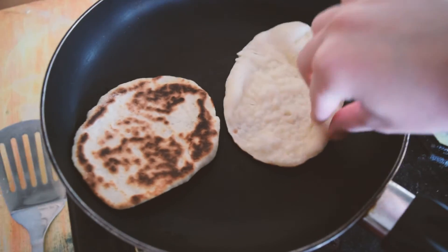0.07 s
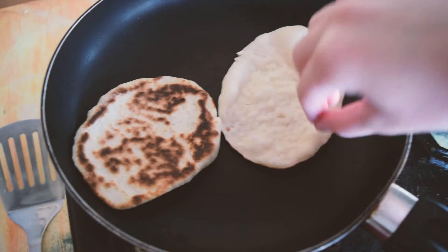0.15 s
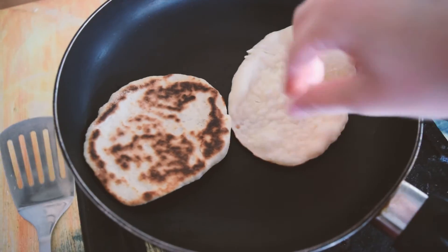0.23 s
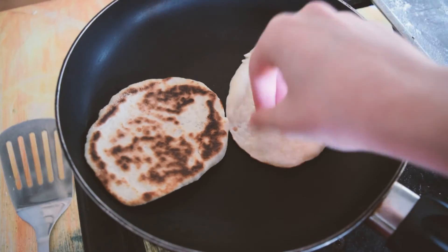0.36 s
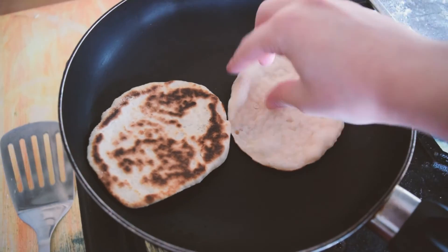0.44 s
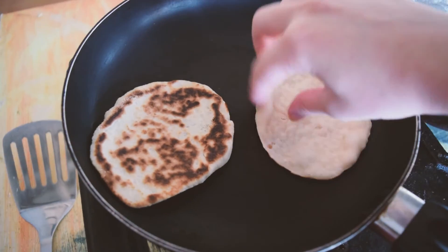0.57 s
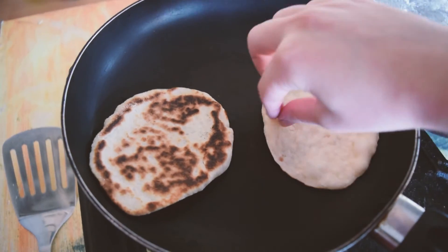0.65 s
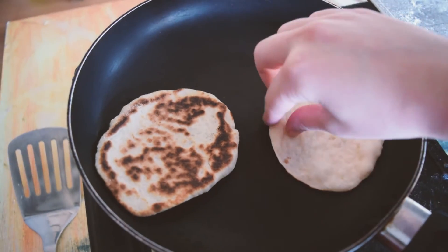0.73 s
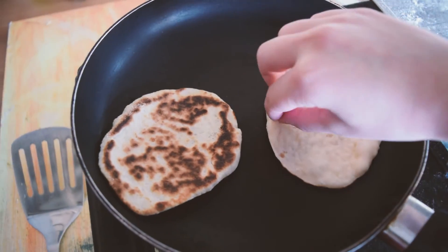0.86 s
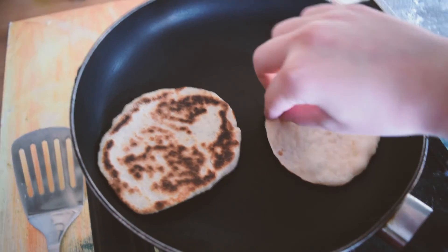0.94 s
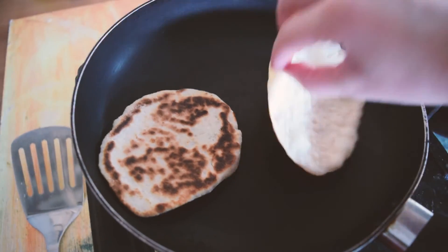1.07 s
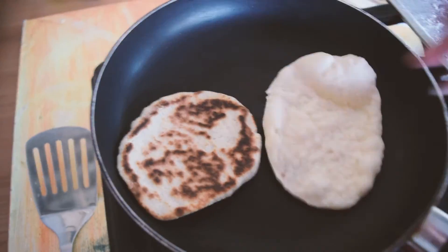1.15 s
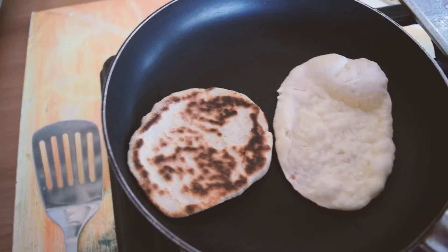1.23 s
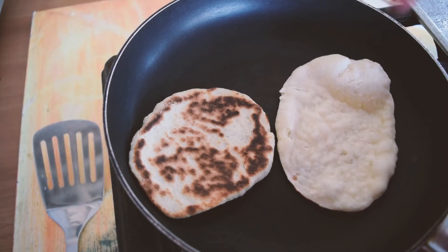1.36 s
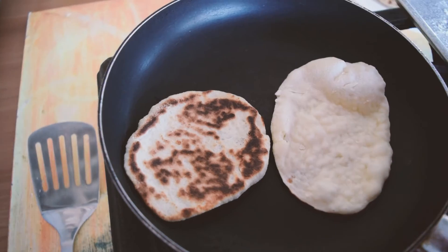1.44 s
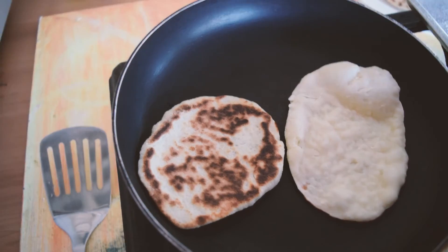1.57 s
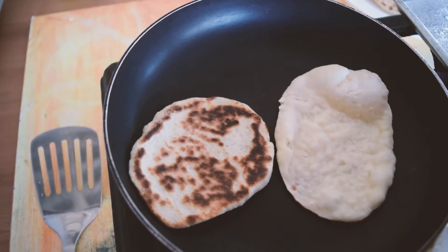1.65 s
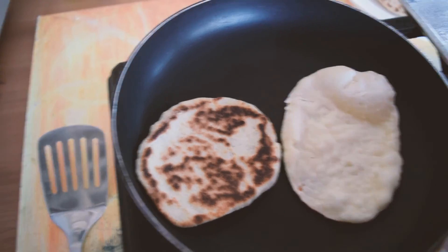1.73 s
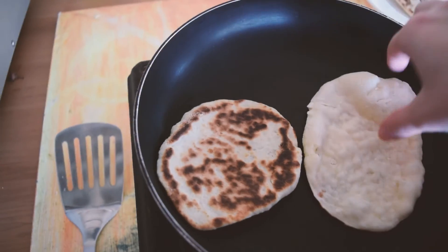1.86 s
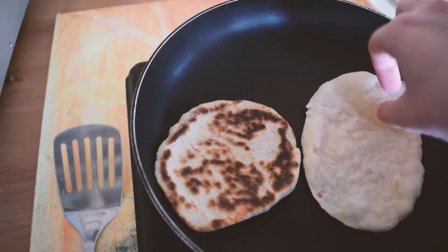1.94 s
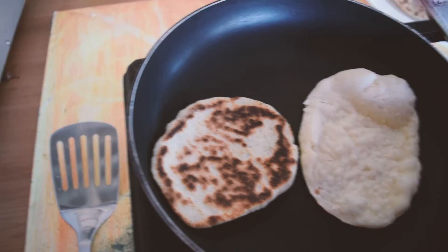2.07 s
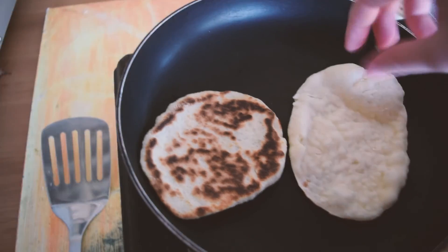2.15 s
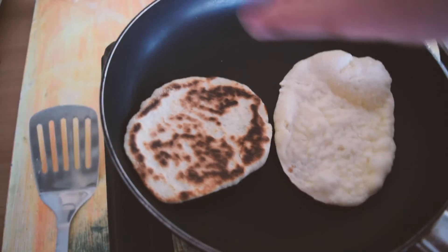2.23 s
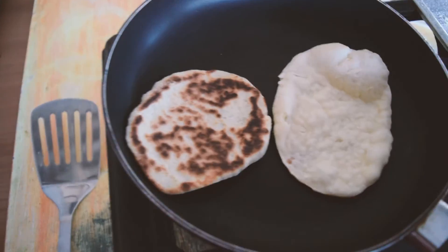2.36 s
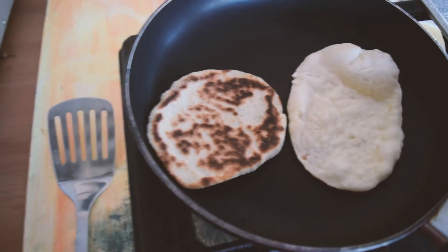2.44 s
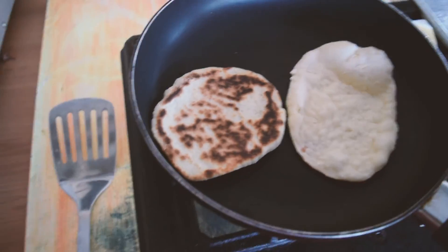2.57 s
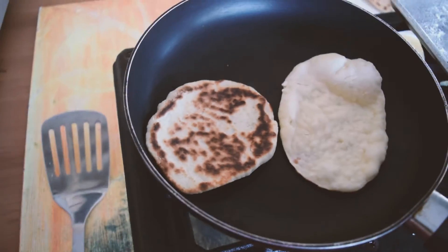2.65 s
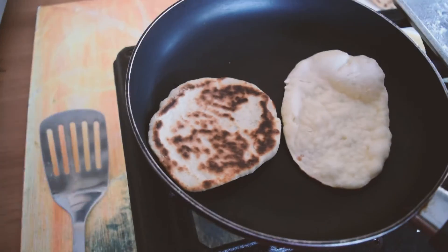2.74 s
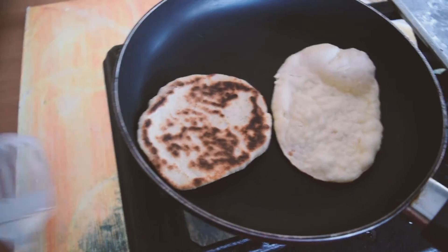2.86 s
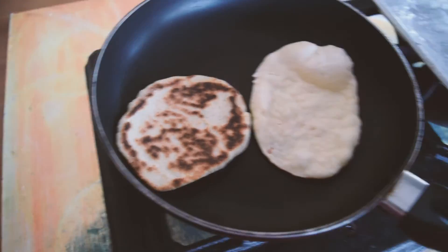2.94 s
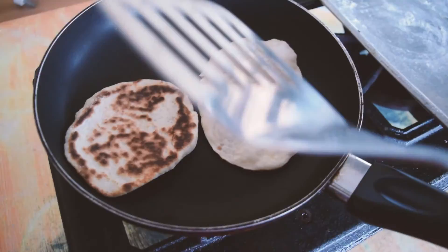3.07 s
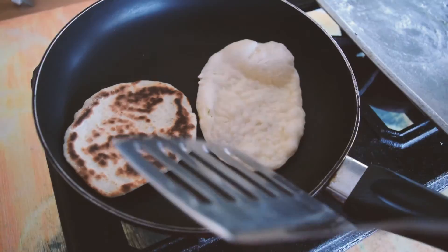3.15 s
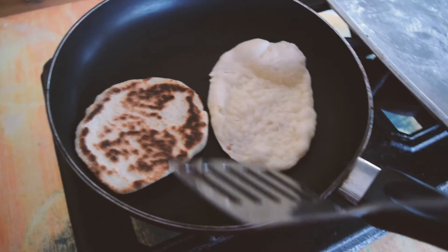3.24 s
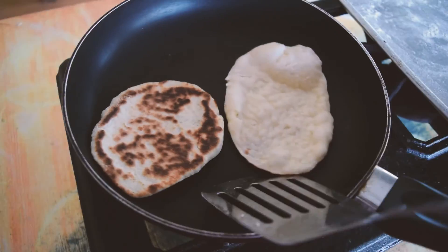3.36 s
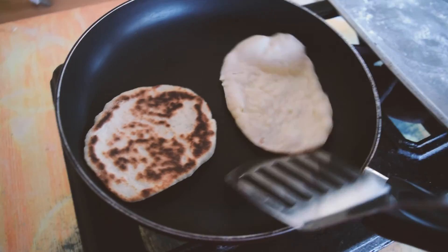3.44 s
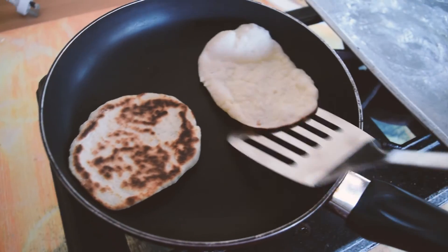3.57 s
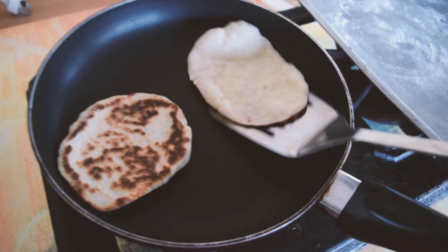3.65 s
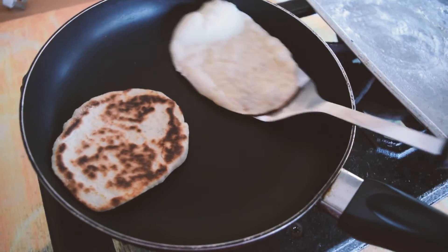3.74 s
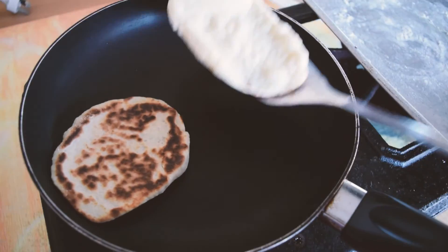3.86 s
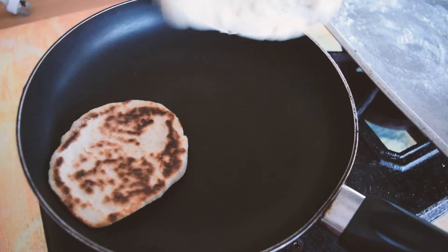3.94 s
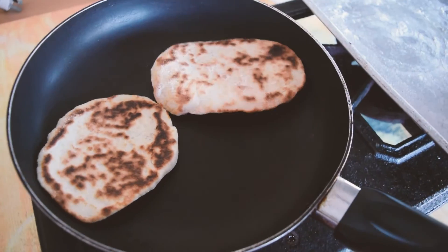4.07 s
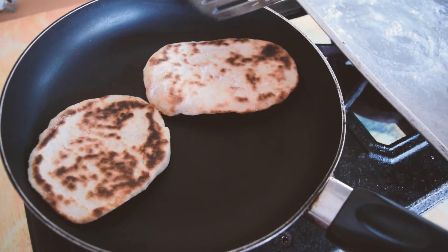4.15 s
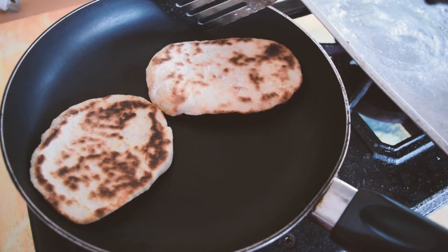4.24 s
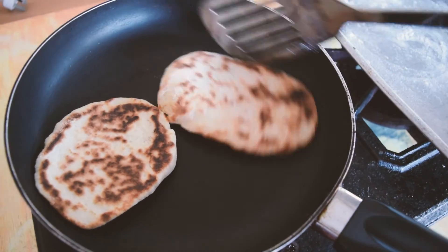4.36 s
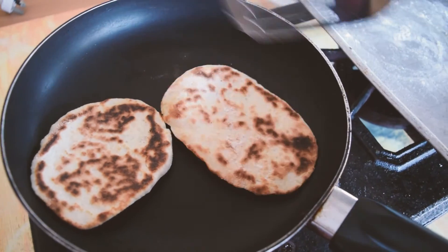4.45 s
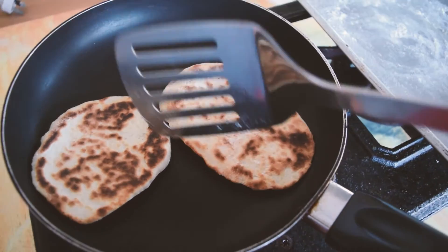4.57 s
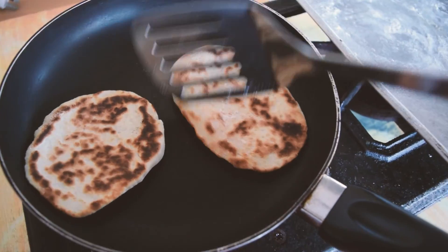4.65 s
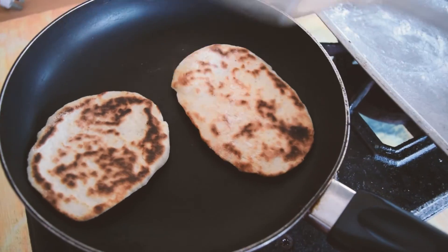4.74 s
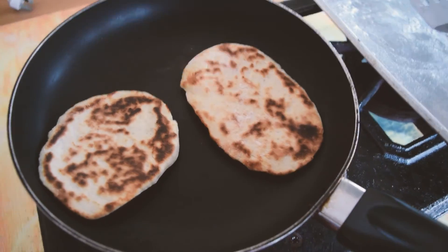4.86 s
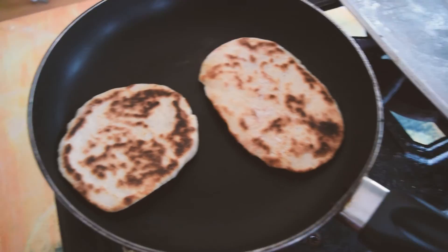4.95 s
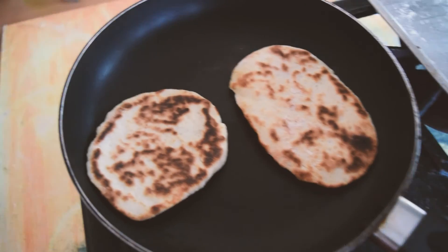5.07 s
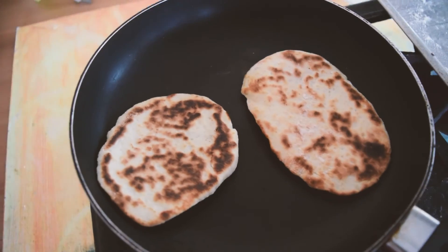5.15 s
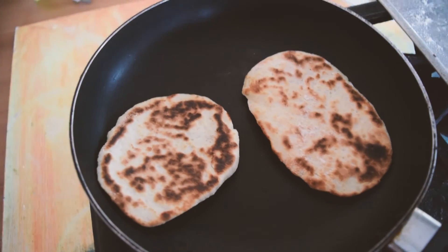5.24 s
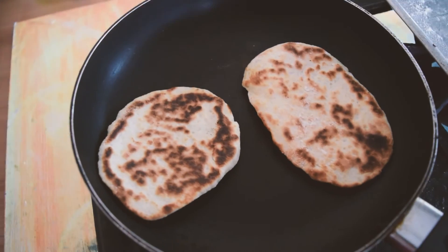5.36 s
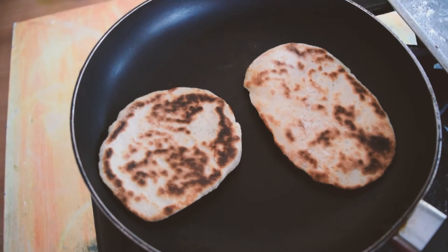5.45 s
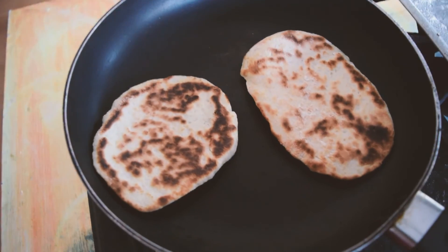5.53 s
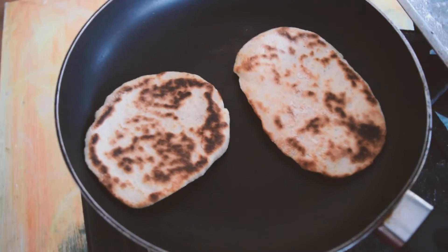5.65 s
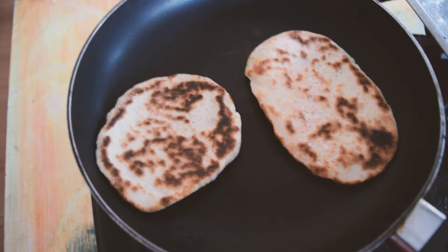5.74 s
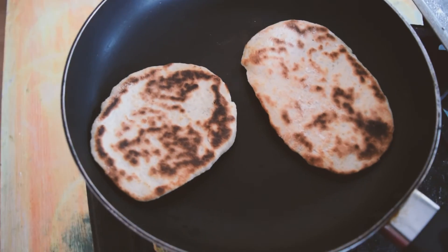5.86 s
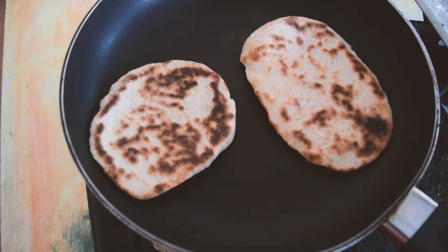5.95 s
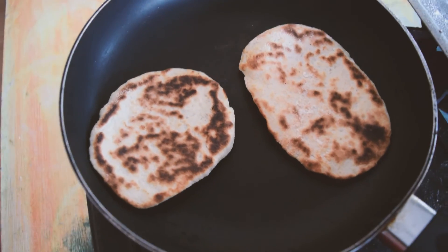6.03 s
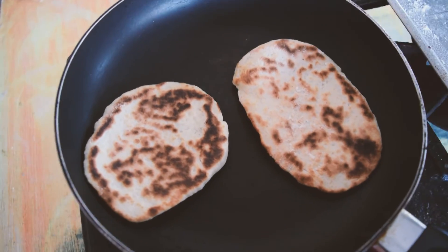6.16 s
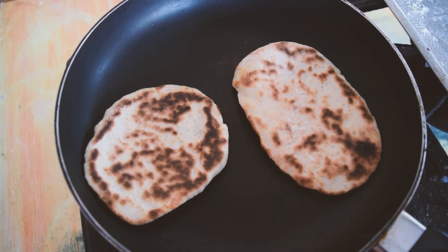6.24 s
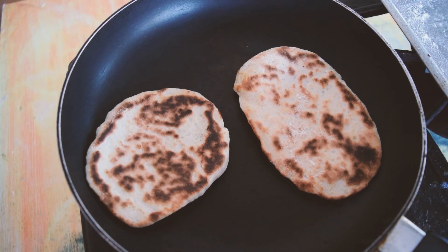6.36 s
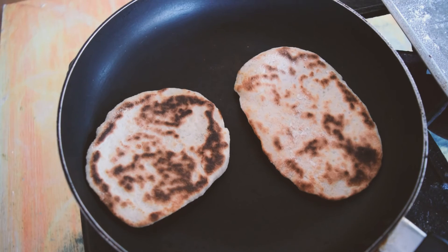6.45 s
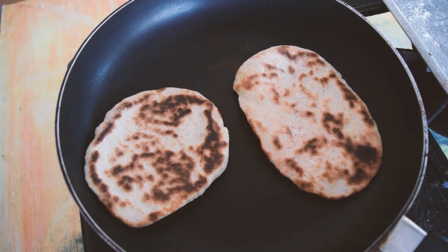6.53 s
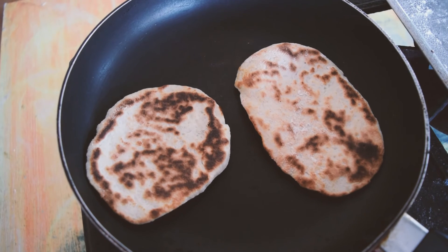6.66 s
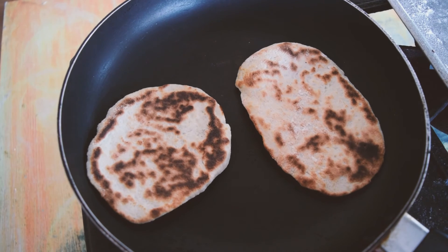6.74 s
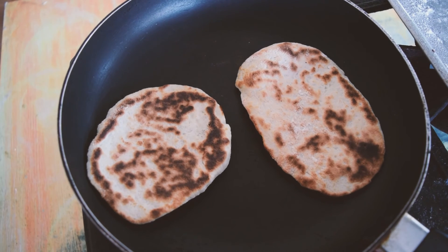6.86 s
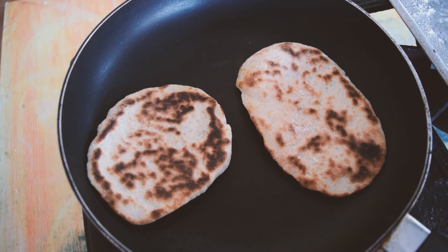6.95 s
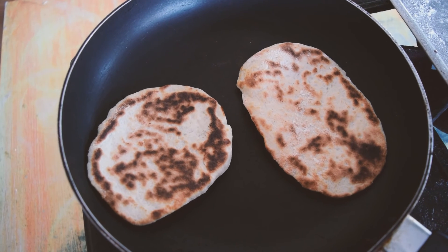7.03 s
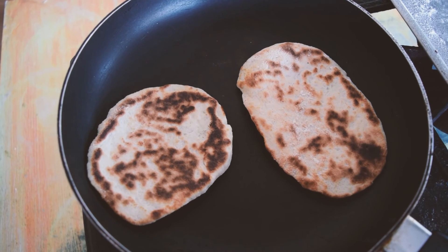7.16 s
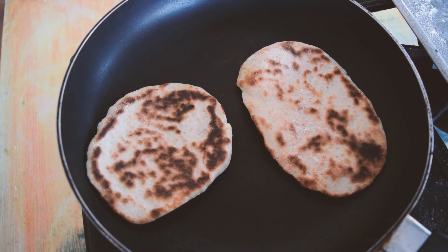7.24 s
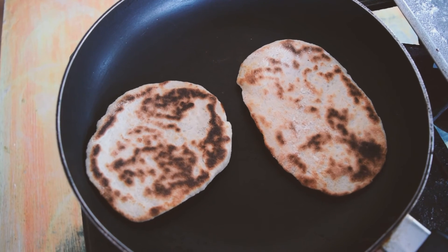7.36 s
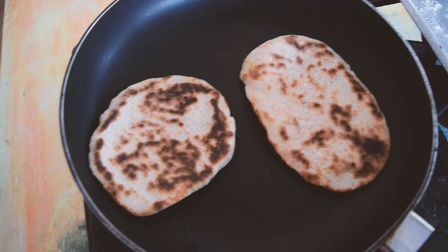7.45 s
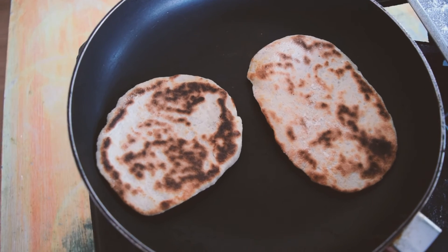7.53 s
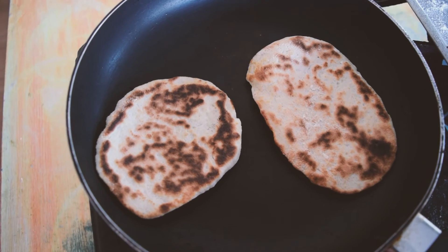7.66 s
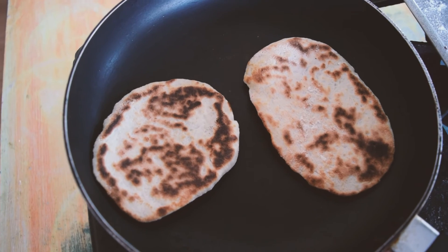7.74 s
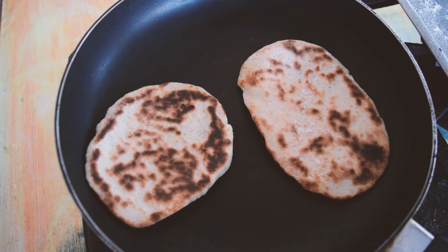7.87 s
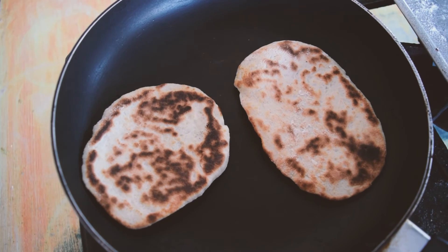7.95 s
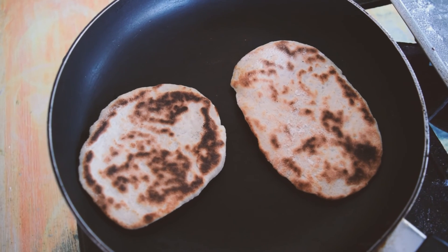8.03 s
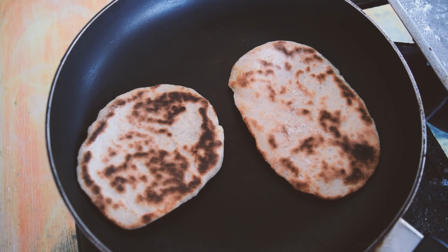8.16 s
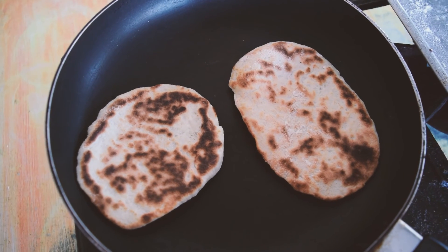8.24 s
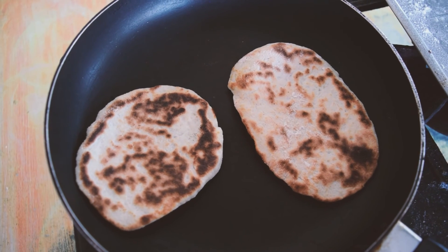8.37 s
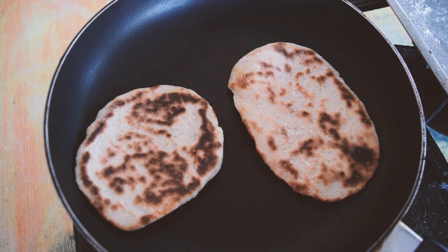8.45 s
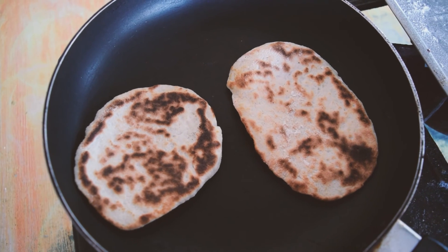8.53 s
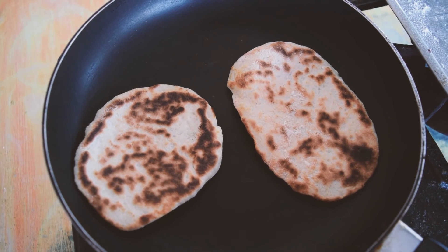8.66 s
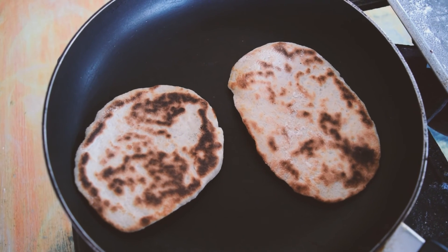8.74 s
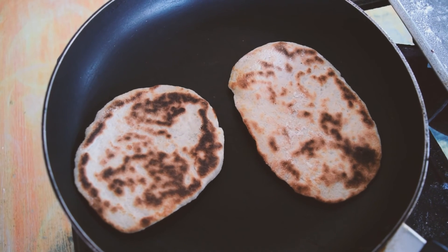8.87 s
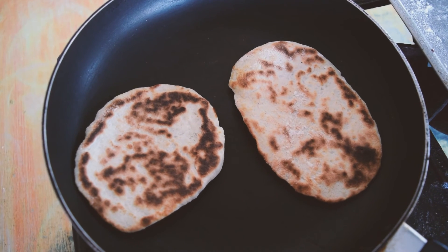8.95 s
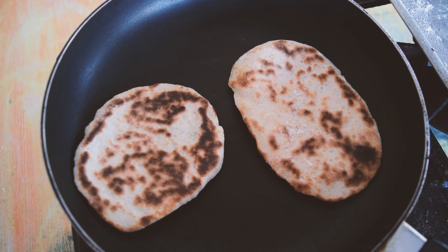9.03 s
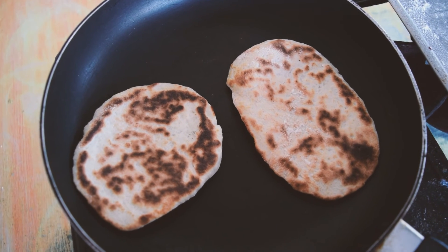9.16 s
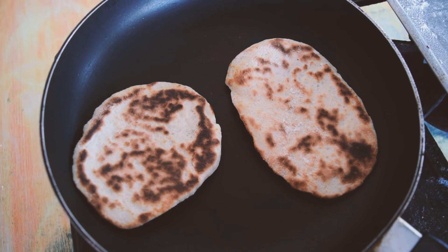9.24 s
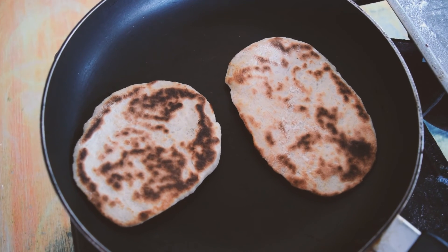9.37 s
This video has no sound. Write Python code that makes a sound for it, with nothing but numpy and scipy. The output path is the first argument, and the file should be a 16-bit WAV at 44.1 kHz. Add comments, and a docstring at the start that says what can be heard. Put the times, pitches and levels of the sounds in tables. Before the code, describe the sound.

A steel spatula clacks, scrapes and rattles against a frying pan and hob, close up, then only faint kitchen hiss with soft sizzling pops remains.

```python
"""Steel spatula on a frying pan

A steel spatula taps, rattles and scrapes on a frying pan and the hob beside it, heard close up.
Each contact is a noise force that excites resonances, with decaying sine notes added for ringing modes.
The kitchen adds filtered-noise hiss and murmur, soft pops near 900 Hz and a decaying-noise reverberation.
The level dips briefly now and then; the loudest knocks clip."""
import sys
import numpy as np
from scipy import signal
from scipy.fft import rfft, irfft, next_fast_len
from scipy.io import wavfile
from scipy.ndimage import uniform_filter1d, map_coordinates

SR = 44100
rng = np.random.default_rng(int(sys.argv[2]) if len(sys.argv) > 2 else 0)


def wav_out(sig):
    """Save sig, one row per channel (or a flat mono array), as 16-bit PCM at SR to the path in sys.argv[1]."""
    wavfile.write(sys.argv[1], SR, np.round(np.clip(np.atleast_2d(sig).T, -1, 1) * 32767).astype(np.int16))


N = 414540  # length in samples


def amp(db):
    """Level in dB to amplitude gain."""
    return 10 ** (np.asarray(db) / 20)


def unit(x):
    """Normalisation to an rms of 1."""
    return x / np.sqrt(np.mean(x ** 2) + 1e-20)


def along(points, hz):
    """Interpolation of (f/Hz, value) points on a logarithmic frequency axis."""
    f, value = np.transpose(points)
    return np.interp(np.log(hz + 1), np.log(f + 1), value)


def filtered(x, response):
    """Linear filtering: the spectrum of x times a response of frequency."""
    size = next_fast_len(N + SR // 2)
    hz = np.fft.rfftfreq(size, 1 / SR)
    return irfft(rfft(x, size) * response(hz), size)[..., :N]


def bumps(modes, hz):
    """Lorentzian resonance curves, summed as power, from (f/Hz, width/Hz, level/dB)."""
    return sum(amp(db) ** 2 / (1 + (2 * (hz - centre) / width) ** 2) for centre, width, db in modes)


def wobble(rate):
    """Slow random modulation: a smooth curve through random knots, rate of them a second."""
    knots = rng.standard_normal(int(N * rate / SR) + 4)
    return map_coordinates(knots, [np.arange(N) * rate / SR])


def patches(x, patchy_db, wide, long):
    """Time-frequency modulation: a random gain field of rms patchy_db, smoothed over bins and frames."""
    z = signal.stft(x, nperseg=256)[2]
    field = rng.standard_normal(z.shape[-2:])
    field = uniform_filter1d(uniform_filter1d(field, wide, 0), long, 1)
    return signal.istft(z * amp(patchy_db * unit(field)), nperseg=256)[1][..., :N]


def waver(hz, t):
    """Narrow-band tone: random in-phase and quadrature parts sway its strength and phase."""
    depth = 3.9 * min(hz / 1200, 1)  # low tones are steadier
    a, b = uniform_filter1d(rng.standard_normal((2, len(t))), 400) * depth
    return (1 + a) * np.sin(2 * np.pi * hz * t) + b * np.cos(2 * np.pi * hz * t)


def place(s):
    """Coupling by position: the pan's share of the power and the grit level at a time."""
    # where the blade works: t/s, share that rings the pan (0-1), grit of rubbing relative to blade/dB
    places = [(0.0, 0.16, -14), (2.5, 0.03, -17), (2.9, 0.06, -7), (3.3, 0.03, -5), (3.48, 0.63, 3.5),
              (3.65, 0.92, -18), (3.8, 0.57, -15), (4.05, 0.14, -9), (4.4, 0.72, -7), (4.7, 0.27, -5.5),
              (5.1, 0.04, -13), (5.35, 0.02, -23), (5.45, 0, -17), (9.4, 0.13, 10)]
    at, ring, grit_db = np.transpose(places)
    return np.interp(s, at, ring), np.interp(s, at, grit_db)


def shares(body_db, grit_db, ring):
    """Power division: gains for body, blade and grit, first on the dull hob, then in the ringing pan."""
    ring = np.clip(ring, 0, 1)
    surface = np.sqrt([1 - ring, ring])[:, None]
    bands = amp([body_db, 0 * ring, grit_db])
    return (surface * bands).reshape(6, -1)


def air():
    """Broadband noise shaped by spectrum: patchy murmur below, smooth hiss above, narrow bands in both."""
    # colour of kitchen air: f/Hz, level/dB
    colour = [(25, -18), (60, -15.5), (150, -8), (300, -3), (600, -3.5), (900, 2), (1500, -4.5), (2500, -6),
              (3200, -11.5), (12700, -24.5), (13800, -22.5), (15800, -49)]
    # narrow bands: f/Hz, width/Hz, level over the hiss at first/dB, level later/dB
    narrow = [(2350, 61, -23, 5), (6260, 97, 7, 8.5), (7160, 125, 12.5, 6.5), (8060, 99, 7, -1),
              (9340, 100, 6.5, 6.5), (10160, 380, 3.5, 6.5), (11630, 200, 5.5, 7), (13400, 190, 1, 8)]
    # course of the air: t/s, murmur level/dB, hiss level/dB (both before the trims below)
    course = [(0.0, -42.5, -48.5), (3.43, -40, -48.5), (9.4, -42, -51)]
    turn_s, crossover_hz = 3.7, 3500  # the bands change strength at turn_s
    murmur_trim_db, hiss_trim_db = -3.5, -5.0

    def low_share(hz):
        return 1 / (1 + (hz / crossover_hz) ** 4)

    def spectra(hz):
        extra = [bumps([(b[0], b[1], b[k]) for b in narrow], hz) for k in (2, 3)]
        return amp(along(colour, hz)) * np.sqrt(1 + np.array(extra))

    s, murmur_db, hiss_db = np.transpose(course)
    t = np.arange(N) / SR
    patchy = patches(rng.standard_normal(N), 2.74, 3, 12)
    murmur = filtered(patchy, lambda hz: spectra(hz) * np.sqrt(low_share(hz)))
    hiss = filtered(rng.standard_normal(N), lambda hz: spectra(hz) * np.sqrt(1 - low_share(hz)))
    murmur, hiss = [unit(np.where(t < turn_s, *pair)) for pair in (murmur, hiss)]
    murmur_level = np.interp(t, s, murmur_db) + murmur_trim_db + wobble(11.0)
    hiss_level = np.interp(t, s, hiss_db) + hiss_trim_db + 0.99 * wobble(8.2)
    return amp(murmur_level) * murmur + amp(hiss_level) * hiss


def pops():
    """Amplitude-modulated tones: slow noise widens two low resonances into soft dull flutters."""
    # clear pops: t/s, level before the pulse shape/dB, f/Hz
    clear = [(6.231, -36, 925), (7.245, -35, 880), (8.872, -34.5, 950)]
    draw = rng.random((int(N / SR) * 60, 3))  # many fainter pops at random
    faint_db = -51 - 2.5 * np.log(draw[:, 1] + .01)
    faint = np.c_[draw[:, 0] * N / SR, faint_db, 720 * 1.5 ** draw[:, 2]]
    out, t = np.zeros(N + SR), np.arange(SR // 16) / SR
    shape = t / 0.0041 * np.exp(1 - t / 0.005)
    for s, db, hz in [*clear, *faint]:
        a, b = uniform_filter1d(rng.standard_normal((2, len(t))), 100) * 10
        tones = (.5 + a) * np.sin(2 * np.pi * hz * t) + .5 * b * np.sin(2 * np.pi * 1.5 * hz * t)
        out[round(s * SR):][:len(t)] += amp(db) * shape * tones
    return out[:N]


def taps():
    """Impact excitation: a blow, a decaying clatter of tiny contacts, and a short note from the blade."""
    # taps: t/s, level before the trims below/dB, body relative to blade/dB, grit relative to blade/dB,
    # clatter t60 before the scaling below/s, loudest note f/Hz
    tap_rows = [(0.039, -20, -3, -23, 0.025, 3230), (0.2395, -7, 0, -37, 0.014, 4200),
                (1.209, 1.5, -5.5, -6.5, 0.05, 1956), (1.6599, -12.5, -7, -25, 0.11, 1260),
                (1.9764, -23.5, -4.5, -12, 0.056, 2340), (2.4653, -21, 0.5, -26, 0.023, 2440),
                (2.8343, 6.5, -13.5, -22, 0.058, 2265), (2.8441, 2, -15, -10, 0.037, 1920),
                (2.8495, 3.5, -14, -23, 0.047, 1980), (2.9325, -1, -13, -11, 0.014, 4140),
                (3.0409, -16.5, -8.5, -25, 0.012, 3200), (3.3262, -7.5, -8, 2, 0.063, 2950),
                (3.4092, -13.5, -1, -30, 0.044, 2090), (3.521, -13.5, -6.5, -23, 0.047, 3970),
                (3.6621, 0, -8.5, -18, 0.036, 2020), (3.708, -12, -27, -22, 0.13, 2210),
                (3.7521, -10.5, 2.5, -22, 0.044, 1670), (3.7736, -0.5, -16, -23, 0.014, 2060),
                (3.783, -6, -7, -6, 0.025, 2240), (4.0387, -6, -18, -4.5, 0.047, 4310),
                (4.0533, 4.5, -12.5, -6.5, 0.021, 1760), (4.2858, -30.5, 17.5, -1, 0.065, 4220),
                (4.4385, -14, -1, 2, .012, 600), (4.4462, -10, -3, -4, .014, 4240),
                (4.4542, -17, 3, 1, 0.02, 2100), (4.4658, -6.5, 5.5, -8, 0.047, 2090),
                (5.1458, -22.5, -4, 2, 0.088, 3350), (5.1662, -4.5, -14, -0.5, 0.083, 3730),
                (5.198, -9, -6, -10, .02, 2100), (5.2064, -9, 0, 0, 0.059, 1900),
                (5.2266, -8.5, -11, 1, 0.083, 3730), (5.2861, -17, -2, -5.5, 0.08, 3800),
                (5.3399, 2, -1, -5.5, 0.034, 1890), (5.3445, 0, 1.5, -29, 0.067, 1680),
                (5.3694, -5.5, -3, -7, 0.03, 2010), (5.681, -22, 10, -3, 0.02, 1210),
                (5.6995, 1, -19, 4, 0.015, 4460), (5.7632, -10, -1, -11, 0.0092, 4200),
                (6.4446, -21.5, 1, -23, 0.023, 2370), (7.0991, -18.5, -5, 8.5, 0.015, 2320)]
    # thin bright ticks: t/s, level before the trims below/dB
    tick_rows = [(1.1131, -18), (1.2658, -24), (1.6334, -31), (3.028, -27), (4.7404, -14.5)]
    tick_body_db, tick_grit_db, tick_t60, tick_hz = -20, -4, .008, 4500  # t60 in s, before scaling
    loudest_random_db = -29  # before the trims
    clatter_trim_db, note_trim_db = -9.5, -7.0
    rattle_db = 3.5  # rms unevenness of the clatter

    force, notes, t = np.zeros((6, N + SR)), np.zeros(N + SR), np.arange(SR // 8) / SR
    lasts = np.tile([1.3, 1, .7], 2)[:, None]  # t60 scale: bass lasts longer, treble shorter
    draw = rng.random((int(N / SR) * 2, 2))
    random_ticks = zip(draw[:, 0] * N / SR, loudest_random_db - 8 * draw[:, 1])
    ticks = [(s, db, tick_body_db, tick_grit_db, tick_t60, tick_hz) for s, db in [*tick_rows, *random_ticks]]
    for s, db, body_db, grit_db, t60, note_hz in [*tap_rows, *ticks]:
        start = round(s * SR)
        rise = 1 - np.exp(-t / (0.011 * t60))  # long clatters build up more slowly
        lumps = unit(uniform_filter1d(rng.standard_normal(len(t)), size=80))
        rattle = unit(amp(rattle_db * lumps))  # separate contacts
        blow = 3 * (np.arange(len(t)) == 9)
        chatter = rng.standard_normal((6, len(t))) * rise * rattle + blow
        decay = amp(db + clatter_trim_db - 60 * t / (t60 * lasts))
        force[:, start:][:, :len(t)] += decay * shares(body_db, grit_db, place(s)[0]) * chatter
        note_decay = amp(db + note_trim_db - 60 * t / (0.79 * t60))
        notes[start:][:len(t)] += note_decay * rise * waver(note_hz, t)
    return force[:, :N], notes[:N]


def kernels(size=2048):
    """Minimum-phase resonance: six causal unit-energy responses, dull on the hob, then ringing in the pan."""
    # broad colour of contacts: f/Hz, level/dB
    contact_colour = [(35, -55), (60, -22), (220, -7.5), (370, 1.5), (618, 0), (1400, 0.5), (1940, -1.5),
                      (3810, -4.5), (5790, -15), (8810, -15), (15800, -38)]
    # pan and blade resonances: f/Hz, width/Hz, level/dB (their power curve weights the amplitude below)
    pan_modes = [(580, 140, -4.5), (760, 210, -1.5), (1320, 56, -7), (1707, 43, -16), (2047, 116, -2),
                 (3102, 87, -2.5), (3890, 140, -8), (4250, 155, -2), (4630, 80, -4), (5500, 95, -5.5),
                 (9330, 120, -7), (10600, 170, -3)]
    # borders of the body, blade and grit ranges: f/Hz
    split_hz = (1200, 5000)
    hz = np.fft.rfftfreq(size, 1 / SR)
    low, high = [1 / np.sqrt(1 + (hz / edge) ** 4) for edge in split_hz]
    ranges = [low, high * np.sqrt(1 - low ** 2), np.sqrt(1 - high ** 2)]
    dull = amp(along(contact_colour, hz)) * ranges
    ringing = dull * (1 / 16 + bumps(pan_modes, hz))
    cepstrum = irfft(np.log(np.r_[dull, ringing] + 1e-6), size)
    cepstrum[:, 1:size // 2] *= 2
    cepstrum[:, size // 2 + 1:] = 0  # minimum phase: nothing sounds before the contact
    h = irfft(np.exp(rfft(cepstrum)), size)
    return h / np.linalg.norm(h, axis=1, keepdims=True)


def scrapes():
    """Friction excitation: the blade edge catches on the surface, giving uneven grit under each stroke."""
    # long strokes, one curve each: t/s, pressure level/dB, body relative to blade/dB
    strokes = [
        [(2.839, -17, -4), (2.866, -21.5, 3), (2.872, -35.5, 4), (2.905, -35.5, -3), (2.92, -54, -8)],
        [(3.461, -46, -2), (3.525, -32.5, -3), (3.545, -34.5, -3), (3.6, -27, -6), (3.635, -26.5, -1),
         (3.655, -23, 1), (3.676, -25, -8), (3.695, -35.5, -15), (3.73, -30.5, -7), (3.768, -30, -6),
         (3.79, -31, 6), (3.81, -45, 2), (3.855, -40, -5)],
        [(4.382, -31, -5), (4.395, -33.5, -6), (4.423, -29, 2), (4.435, -32, 1), (4.467, -34, -6)],
        [(5.168, -17.5, -14), (5.185, -14, -5), (5.195, -30, 1), (5.21, -20, -3.5), (5.238, -19.5, -8.5),
         (5.258, -41, 6), (5.284, -41, 7), (5.303, -28, -4), (5.325, -38, 14)],
        [(5.347, -23, 11.5), (5.398, -25.5, -2.5), (5.408, -19, -5.5), (5.462, -27, -1.5), (5.475, -45, 9),
         (5.498, -46, 8), (5.506, -37, 3), (5.572, -63, 11)],
    ]
    # short brushes: t/s, length/s, first level/dB, change to the end/dB, body relative to blade/dB
    brushes = [(0.194, 0.038, -42, -4.5, -12), (0.549, 0.046, -37.5, 1.5, -8),
               (0.677, 0.033, -35.5, -7, -10), (1.096, 0.11, -37.5, -7, -7), (3.394, 0.054, -44, -13, 8),
               (4.053, 0.067, -28, -15.5, 1), (4.671, 0.058, -37, 5, -16),
               (5.697, 0.0058, -14.5, -0.5, -7.5)]
    edge_s, swell = 0.012, 0.42  # pressure build-up time; share of its length over which a brush eases
    snag_db, snags_per_s = 7, 500  # mean size of sharp snags before the cap at twice that; mean rate
    drift_db = 3.4  # rms depth of the colour shifts

    force = np.zeros((6, N))
    short = [[(s, db, body_db), (s + length, db + change_db, body_db)]
             for s, length, db, change_db, body_db in brushes]
    eases = [edge_s] * len(strokes) + [swell * row[1] for row in brushes]
    for stroke, ease in zip([*strokes, *short], eases):
        s, press_db, body_db = np.transpose(stroke)
        at = np.arange(round((s[0] - edge_s / 2) * SR), round((s[-1] + ease / 2) * SR))
        t = at / SR
        fade = np.clip(np.minimum((t - t[0]) / edge_s, (t[-1] - t) / ease), 0, 1)
        press = amp(np.interp(t, s, press_db)) * fade
        ring, grit_db = place(t)
        force[:, at] += shares(np.interp(t, s, body_db), grit_db, ring) * press
    snags = snag_db * (rng.random(N) < snags_per_s / SR) * rng.exponential(size=N)
    catches = amp(np.minimum(snags, 2 * snag_db) + 1.6 * wobble(250) + 1.15 * wobble(900))
    rubbing = patches(rng.standard_normal((3, N)), drift_db, 5, 8)  # the colour shifts as the edge moves
    return force * unit(catches * np.tile(rubbing, (2, 1)))


def rings():
    """Free modal decay: single modes sound on, a little unsteady, until a touch damps them."""
    BLADE_HZ = 4190  # a high ringing note of the blade
    # rings: start t/s, stop t/s, f/Hz, level/dB, t60/s
    ring_rows = [(1.209, 1.225, 2970, 1.5, 0.015), (1.2095, 1.24, 4180, -5, 0.02),
                 (1.211, 1.236, 1280, -11, 0.045), (1.66, 1.827, 331, -28.5, 0.39),
                 (1.658, 1.707, 494, -22.5, 0.17), (1.658, 1.763, 1460, -32.5, 0.3),
                 (1.658, 1.76, 1690, -30.5, 0.26), (1.657, 1.69, 3500, -22, 0.058),
                 (1.658, 1.8, 1985, -21, 0.18), (3.327, 3.36, 4420, -19, 0.027),
                 (2.86, 2.922, BLADE_HZ, -27, 1.1), (2.917, 3.02, BLADE_HZ, -37.5, 0.3),
                 (4.502, 4.676, 2666, -39.5, 3.4), (5.165, 5.192, 466, -9, 0.079),
                 (5.342, 5.557, 339, -23, 0.41), (5.415, 5.485, 479, -29, 0.37)]
    out = np.zeros(N)
    for start, stop, hz, db, t60 in ring_rows:
        t = np.arange(round((stop - start) * SR)) / SR
        edges = np.clip(np.minimum(t, (t[-1] - t) / 4) / 0.0013, 0, 1)  # the end fades four times slower
        out[round(start * SR):][:len(t)] += amp(db - 60 * t / t60) * edges * waver(hz, t)
    return out


def room(x):
    """Reverberation by convolution: a noise tail in which each frequency decays at its own rate."""
    # decay of the kitchen: f/Hz, t60/s
    decay_times = [(200, 0.39), (10000, 0.014)]
    hz, t, z = signal.stft(rng.standard_normal(SR // 3), SR, nperseg=256)
    decay = amp(-60 * t / along(decay_times, hz)[:, None])
    tail = signal.istft(z * decay, SR, nperseg=256)[1]
    delayed = np.pad(x, (300, 0))  # delay in samples
    return signal.fftconvolve(delayed, tail / np.linalg.norm(tail))[:N]


def scene():
    """Source-filter superposition: contacts drive the hob and pan, the room answers, pops and air add."""
    room_db = -24
    force, notes = taps()
    struck = signal.fftconvolve(force + scrapes(), kernels(), axes=1)[:, :N].sum(0)
    contacts = struck + notes + rings()
    return (contacts + amp(room_db) * room(contacts) + pops() + air())[None]


def record(dry):
    """Saturation and band limiting: brief level dips, rounded clipping at full scale, a steep low-pass."""
    # brief dips: t/s, depth/dB
    dip_rows = [(0.821, 25), (2.388, 30), (3.313, 22), (7.213, 18), (7.474, 23), (8.287, 20)]
    top_hz, dip_s = 15850, 0.0029  # half-amplitude frequency; Gaussian time constant of a dip
    t = np.arange(N) / SR
    dips = amp(-sum(db * np.exp(-((t - s) / dip_s) ** 2) for s, db in dip_rows))
    x = dry * dips
    clipped = x / (1 + np.abs(x) ** 8) ** (1 / 8)
    return filtered(clipped, lambda hz: 1 / (1 + (hz / top_hz) ** 400))


dry = scene()
out = record(dry)
wav_out(out)
```